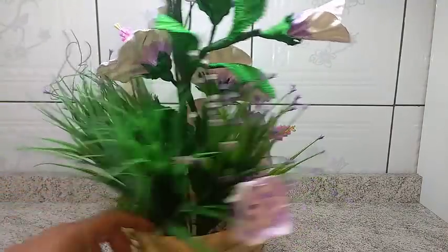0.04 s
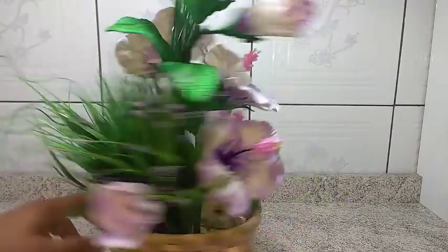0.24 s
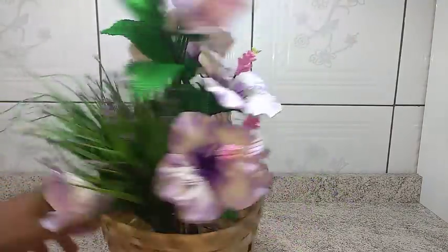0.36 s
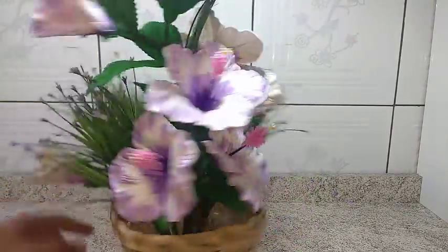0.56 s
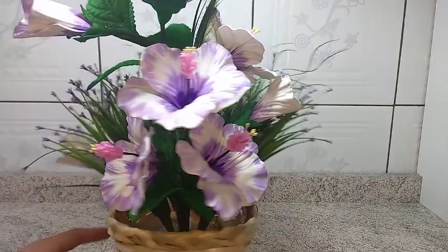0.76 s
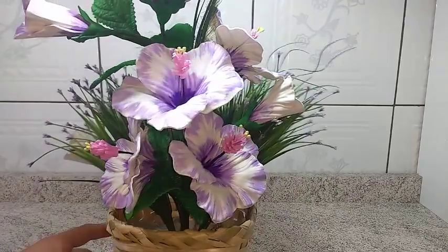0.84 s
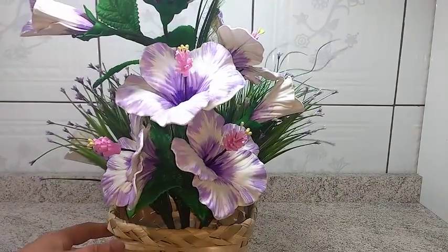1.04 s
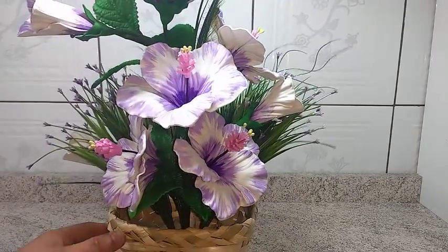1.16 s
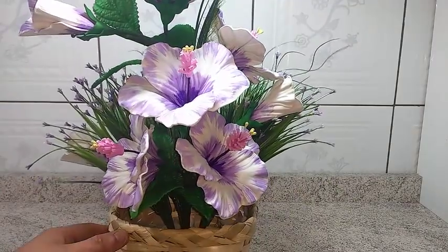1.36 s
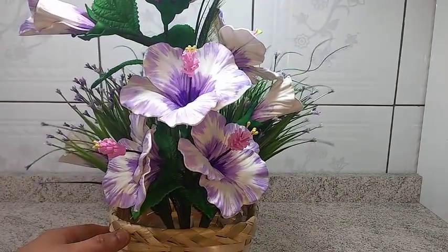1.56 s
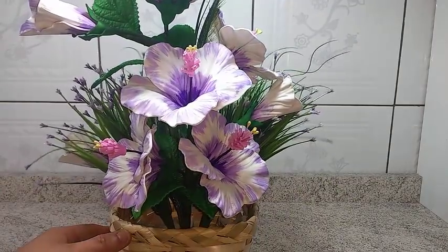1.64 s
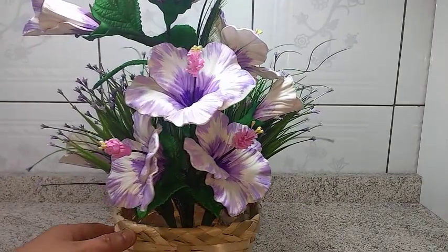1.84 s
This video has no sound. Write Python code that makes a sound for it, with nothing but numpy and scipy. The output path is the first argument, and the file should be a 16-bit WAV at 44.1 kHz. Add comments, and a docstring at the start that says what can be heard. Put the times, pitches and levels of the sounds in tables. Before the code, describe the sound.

Rough, rumbling scrape of a woven basket turned on stone, with rustling artificial leaves.

```python
"""A wicker basket of artificial flowers is turned on a stone counter in two pushes: its base judders,
the weave rasps over the grain of the stone and the leaves rustle. About a second in, a stem snaps free
with a tick and the basket settles with a soft bump. A faint hum passes through the quiet of the small
tiled room, and at the very end the hand nudges the basket again. A close pair of microphones widens
the stereo."""
import sys
import numpy as np
from scipy import signal
from scipy.fft import rfft, irfft, next_fast_len
from scipy.io import wavfile
from scipy.ndimage import uniform_filter1d

SR = 44100
rng = np.random.default_rng(int(sys.argv[2]) if len(sys.argv) > 2 else 0)


def store_pcm(level_fs):
    """Save levels as 16-bit WAV."""
    pcm = np.round(np.clip(level_fs, -1, 1) * 32767).astype(np.int16)
    wavfile.write(sys.argv[1], SR, np.atleast_2d(pcm).T)


N = 83790

SLIPS_PER_S, CATCHES_PER_S, GRIT_PER_S = 390, 2200, 5200
# Low resonances of the basket's base. Each row: pitch in Hz, width in Hz, relative level in dB.
BASE_MODES = [(136.4, 14.2, 4.5), (154.8, 19, 1.5), (170.2, 19.8, -1), (223, 30, -26.5)]
# Hiss of the stone's grain. Each row: frequency in Hz, gain in dB.
GRIT_EQ = [(300, -30), (1200, -1.5), (2100, 6.5), (3200, 6.5), (3900, -2), (5500, 0.5), (6500, -10.5),
           (8200, -13), (10800, -27)]


def pushes():
    """The hand turns the basket in two shoves, each with its own swell and rasp."""
    # One envelope set a push. Each row: time in seconds, then judder, drone, rasp and hiss in relative dB.
    first_push = [(.119, -46.5, -62, -49, -66), (.138, -35.5, -43.5, -45.5, -77),
                  (.16, -28, -47.5, -33, -52), (.19, -35, -54, -37, -48), (.22, -37, -41, -31.5, -39.5),
                  (.27, -35, -44.5, -32, -40.5), (.33, -36, -39.5, -32, -40),
                  (.37, -37.5, -43.5, -28, -38.5), (.39, -42.5, -46, -45, -43.5),
                  (.42, -43, -56, -36.5, -44)]
    second_push = [(.433, -32.5, -54, -42.5, -37), (.443, -37, -48, -31.5, -40.5),
                   (.468, -28.5, -43, -39, -40.5), (.502, -35, -40, -34, -44.5), (.55, -42, -43, -40, -46),
                   (.59, -35.5, -41, -46.5, -47), (.66, -38, -44.5, -43.5, -48),
                   (.79, -44.5, -46, -51, -50), (.81, -31, -46.5, -48.5, -51.5),
                   (.837, -44.5, -47, -61, -54.5), (.87, -40.5, -53, -55.5, -59.5),
                   (.92, -49.5, -58.5, -60.5, -63), (.96, -63, -55.5, -59, -66)]
    # Tone of the contact in each push. Each row: frequency in Hz, gain in dB.
    first_rasp_eq = [(60, -28), (350, -5), (450, -2), (520, 3), (900, 5.5), (1400, 6.5), (1800, 1),
                     (2600, -41), (4000, -17)]
    second_rasp_eq = [(60, -45), (350, -25), (465, -5), (525, -6), (650, 4), (780, -11.5), (980, 4),
                      (1180, -4), (1400, 2.5), (1750, -38), (2600, -9), (4000, -32)]
    return scrape(first_push, first_rasp_eq) + scrape(second_push, second_rasp_eq)


def scrape(envelopes, rasp_eq):
    """Slips shake the base and side wall, finer catches ring the weave, and grit hisses under the rim."""
    # Resonances of the side wall and the weave. Each row: pitch in Hz, width in Hz, relative level in dB.
    wall_modes = [(305.8, 50.4, 0.79), (336, 55, -0.71)]
    weave_modes = [(543.5, 16.6, 5.5), (636, 33, -4.5), (726, 62, -6), (783.3, 35, -3.5), (875, 22.4, -1.5),
                   (976, 41.5, -4), (1093, 62, -7), (1267, 34, -8.5), (1410, 140, -12)]
    # Tone of the judder and the drone. Each row: frequency in Hz, gain in dB.
    base_eq = [(40, -17.5), (100, -3.5), (125, -10), (240, -2), (420, -48)]
    wall_eq = [(150, 0), (250, -16.5), (300, -17), (380, -12.5), (450, -22)]
    judder, drone, rasp, hiss = levels(envelopes)
    base = grains(SLIPS_PER_S, lambda f: ring(BASE_MODES, f) * colour(base_eq, f),
                  spread_db=1, side_db=-2.5)
    wall = grains(SLIPS_PER_S, lambda f: ring(wall_modes, f) * colour(wall_eq, f),
                  spread_db=1, side_db=-5.5)
    weave = grains(CATCHES_PER_S, lambda f: ring(weave_modes, f) * colour(rasp_eq, f),
                   spread_db=3, side_db=-5)
    grit = grains(GRIT_PER_S, lambda f: colour(GRIT_EQ, f), spread_db=0.5, side_db=1)
    return (amp(-2.5) * judder * steadied(base, span_s=0.0324)
            + drone * steadied(wall, span_s=0.029)
            + amp(-0.5) * rasp * steadied(weave, span_s=0.041)
            + amp(-0.5) * hiss * shifting(grit, patchy_db=2.76))


def scratches():
    """The rim makes short bright scratches over coarse grains of the stone."""
    # Each row: start in seconds, level in dB.
    coarse_grains = [(.434, -35), (.741, -52)]
    envelope = sum(decay(start, db, t60_s=0.18) for start, db in coarse_grains)
    return envelope * grains(GRIT_PER_S, lambda f: colour(GRIT_EQ, f), spread_db=3.5, side_db=-1.5)


def jolts(side_db):
    """The base sticks and slips for a few cycles at a sagging pitch; the side wall answers an octave up."""
    # The base catches on the stone. Each row: start in seconds, hold in seconds, starting pitch in Hz,
    # level in dB before the low cut, octave against the fundamental in dB.
    shudders = [(.130, 0.021, 154, -31, -27), (.171, 0.033, 161, -28.5, -17.5),
                (.268, 0.0093, 174, -26, -27), (.357, 0.0046, 161, -41, -14), (.431, 0.03, 154, -21.5, -25),
                (0.473, 0.01, 151, -31.5, -8), (.526, 0.034, 162.8, -27, -4.5),
                (.579, 0.024, 149, -32, -19), (0.626, 0.019, 143, -27, -14), (.706, 0.025, 154, -30.5, -21),
                (.757, 0.0064, 149.5, -29, -16), (.799, 0.0094, 163, -27, -21)]
    rise_s, t60_s, sag_hz_per_s = 0.0026, 0.095, 570
    out = np.zeros((2, N))
    for start, hold, hz, db, octave_db in shudders:
        t = since(start)
        pitch = hz - sag_hz_per_s * np.minimum(t, hold)
        side_shift = np.array([[0], [rng.normal(0, 2.3)]])
        phase = 2 * np.pi * np.cumsum(pitch * (t > 0)) / SR + side_shift
        envelope = (1 - np.exp(-t / rise_s)) * amp(db - 60 * since(start + hold) / t60_s)
        out += envelope * (np.sin(phase) + amp(octave_db) * np.sin(2 * phase))
    low_cut = signal.butter(3, 111.5, "highpass", fs=SR, output="sos")  # a small body has little deep bass
    return signal.sosfilt(low_cut, out) * amp([[0], [side_db]])


def bump(side_db):
    """A dull, quickly damped knock as the basket settles."""
    start_s, pitch_hz, rise_s = 1.0065, 140, 0.003
    t = since(start_s)
    envelope = decay(start_s, db=-29, t60_s=0.076) * (1 - np.exp(-t / rise_s))
    return envelope * np.sin(2 * np.pi * pitch_hz * t) * amp([[0], [side_db]])


def nudge():
    """The base rubs softly as the hand starts to move the basket again."""
    # Swell of the rub. Each row: time in seconds, level in dB.
    swell = [(1.79, -85), (1.85, -60), (1.875, -52), (1.895, -45), (1.9, -51)]
    envelope, = levels(swell)
    rub = grains(SLIPS_PER_S, lambda f: ring(BASE_MODES, f), spread_db=6, side_db=-12)
    return envelope * steadied(rub, span_s=0.068)


def leaves():
    """The leaves swish as the basket turns; one stem snaps free and shakes them."""
    # Leaves and stems brush each other. Each row: time in seconds, level in dB.
    swell = [(0, -54.5), (.05, -52), (.112, -59), (.124, -45.5), (.16, -42.5), (.2, -41.5), (.375, -41.5),
             (.41, -50), (.438, -46.5), (.46, -49.5), (.53, -52.5), (.63, -59.5), (.845, -70.5),
             (.865, -55.5), (.91, -68)]
    # Their crisp, papery tone. Each row: frequency in Hz, gain in dB.
    leaf_eq = [(500, -29), (1500, -30), (3500, -8.5), (5000, -1.5), (6500, 2.5), (7700, 2), (9700, -2),
               (10800, -4)]
    snap_s = 0.977
    swish, = levels(swell)
    shake = decay(snap_s, db=-54, t60_s=0.077)
    snap = decay(snap_s, db=-53, t60_s=0.014) * rng.standard_normal((2, N))
    brushing = grains(GRIT_PER_S, lambda f: colour(leaf_eq, f), spread_db=2, side_db=1.5)
    return (swish + shake) * shifting(brushing, patchy_db=2.5) + snap


def room(x):
    """A short tail from the tiled walls."""
    # The tail carries little bass. Each row: frequency in Hz, gain in dB.
    tail_eq = [(150, -28.5), (400, 1)]
    t60_s, predelay_s = 0.064, 0.004
    t = np.arange(SR // 2) / SR
    tail = rng.standard_normal((2, len(t))) * amp(-60 * t / t60_s) * (t > predelay_s)
    wet = signal.fftconvolve(x, tail / np.linalg.norm(tail[0]), axes=1)[:, :N]
    return filtered(wet, lambda f: colour(tail_eq, f))


def hum():
    """A faint, slightly unsteady tone swells and fades on the right."""
    # Each row: time in seconds, level in dB before panning.
    swell = [(1.28, -103), (1.345, -53.5), (1.42, -62), (1.475, -49), (1.55, -59.5), (1.68, -52.5),
             (1.72, -61.5), (1.8, -66.5)]
    pitch_hz, waver_rad, pan_db = 313, 0.45, 6.5
    envelope, = levels(swell)
    waver = unit(filtered(rng.standard_normal(N), lambda f: np.exp(-(f / 30) ** 2)))
    tone = np.sin(2 * np.pi * pitch_hz * since(0) + waver_rad * waver)
    return envelope * tone * amp([[-pan_db], [pan_db]])


def room_tone():
    """A steady, wide bed of dark noise."""
    # Tone of the bed, then extra EQ on its side signal. Each row: frequency in Hz, gain in dB.
    bed_eq = [(25, -21.5), (70, -2), (130, -1), (200, -2.5), (350, -2), (600, -5), (1200, -7.5), (2200, -9),
              (4000, -16), (7000, -21), (10800, -28.5)]
    side_eq = [(60, 2.2), (300, 2.7), (800, 0.61), (2500, 1.4), (10000, -1.1)]
    # Its lean. Each row: frequency in Hz, dB added on the left and taken off the right.
    pan = [(60, -8.5), (140, -0.5), (340, -2), (800, -2), (2000, 0), (10000, -2)]
    mid, side = unit(filtered(rng.standard_normal((2, N)), lambda f: colour(bed_eq, f)))
    pair = left_right([mid, filtered(side, lambda f: colour(side_eq, f))])
    return filtered(pair, lambda f: np.array([colour(pan, f), 1 / colour(pan, f)]))


def grains(per_s, response, spread_db, side_db):
    """Random tiny impacts through a response, as mid and side."""
    hits = (rng.random((2, N)) < per_s / SR) * np.sign(rng.standard_normal((2, N)))
    strength = amp(spread_db * rng.standard_normal((2, N)))
    mid, side = filtered(hits * strength, response)
    return np.array([unit(mid), amp(side_db) * unit(side)])


def ring(modes, f):
    """Response of a set of resonances, alternating in polarity."""
    return sum((-1) ** k * amp(db) * 1j * f * width / (hz * hz - f * f + 1j * f * width)
               for k, (hz, width, db) in enumerate(modes))


def steadied(x, span_s):
    """Even out slow swells: the hand keeps a steady pressure."""
    power = np.abs(uniform_filter1d(x[0] ** 2, int(span_s * SR)))
    return x / np.sqrt(power + 0.0011)


def shifting(x, patchy_db):
    """The colour keeps changing as new strands and leaves come into contact."""
    spectrum = signal.stft(x, nperseg=256)[2]
    patches = uniform_filter1d(rng.standard_normal(spectrum.shape[1:]), size=3, axis=0)  # across pitch
    patches = uniform_filter1d(patches, size=16, axis=1)  # across time
    gain = amp(patchy_db * unit(patches))
    return signal.istft(spectrum * unit(gain), nperseg=256)[1][:, :N]


def levels(rows, fade_s=0.013):
    """A gain envelope for each dB column, fading before the first row and after the last."""
    t = since(0)
    times, *columns = np.transpose(rows)
    outside = np.maximum(times[0] - t, 0) + np.maximum(t - times[-1], 0)
    return [amp(np.interp(t, times, db)) * np.exp(-2 * outside / fade_s) for db in columns]


def decay(start_s, db, t60_s):
    """An envelope that jumps to a level and dies away."""
    t = since(start_s)
    return (t > 0) * amp(db - 60 * t / t60_s)


def since(start_s):
    """Seconds since a moment, zero before it."""
    return np.maximum(np.arange(N) / SR - start_s, 0)


def colour(points, hz):
    """Gain of an EQ curve drawn through (Hz, dB) points on a log axis."""
    f, db = np.transpose(points)
    return amp(np.interp(np.log(hz + 1), np.log(f + 1), db))


def filtered(x, response):
    """Pass x through a frequency response."""
    size = next_fast_len(N + SR // 2)
    return irfft(rfft(x, size) * response(np.fft.rfftfreq(size, 1 / SR)), size)[..., :N]


def left_right(x):
    """Mid and side to left and right."""
    return np.array([x[0] + x[1], x[0] - x[1]])


def amp(db):
    """Decibels to gain."""
    return 10 ** (np.asarray(db) / 20)


def unit(x):
    """Scale to rms 1."""
    return x / np.sqrt(np.mean(x ** 2) + 1e-20)


def scene():
    """The basket in its room, over the hum and the room tone."""
    mid_side = pushes() + scratches() + jolts(side_db=-12) + bump(side_db=-9.5) + nudge() + leaves()
    basket = left_right(mid_side)
    return basket + amp(-5.5) * room(basket) + hum() + amp(-54.5) * room_tone()


def record(dry):
    """Stereo widening combs mid and side in turn above the bass; then the top end is cut."""
    # The microphones match less well in the treble, filling the notches.
    # Each row: frequency in Hz, leak in dB.
    leak = [(2500, -115), (5000, -19), (6200, -14), (7500, -2), (9000, 0), (10500, -4.5)]
    delay_s, comb_depth, top_hz = 0.000402, 1.19, 10950

    def widen(f):
        turn = np.pi * f * delay_s
        comb = np.abs([np.sin(np.maximum(turn, np.pi / 2)), np.cos(turn)]) ** comb_depth
        return np.hypot(comb, colour(leak, f))

    mid_side = np.array([dry[0] + dry[1], dry[0] - dry[1]]) / 2
    wide = left_right(filtered(mid_side, widen))
    return filtered(wide, lambda f: f < top_hz)


dry = scene()
out = record(dry)
store_pcm(out)
```